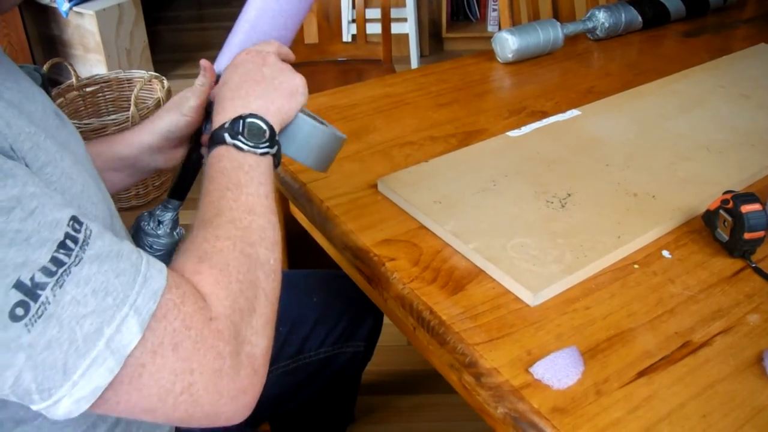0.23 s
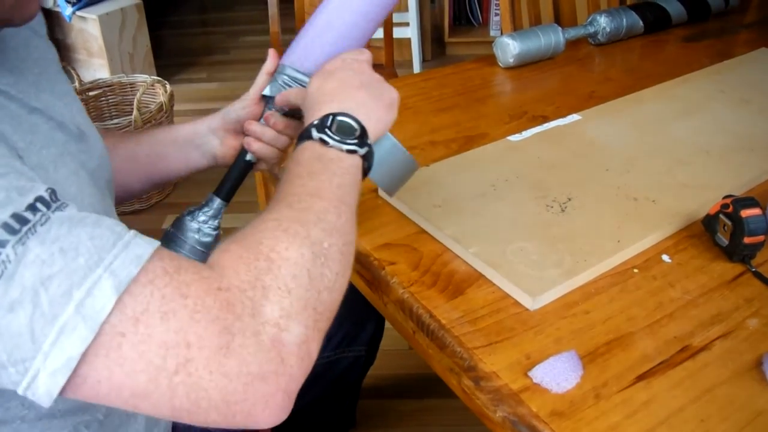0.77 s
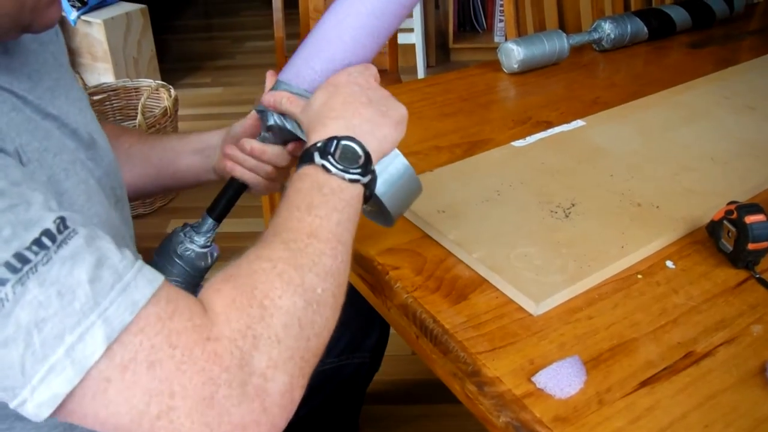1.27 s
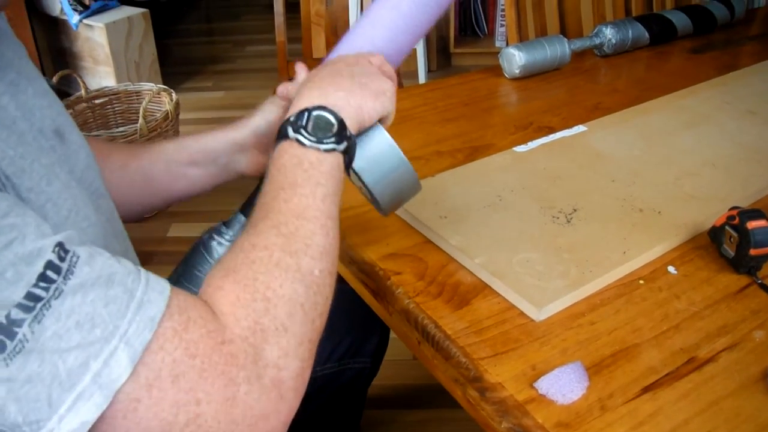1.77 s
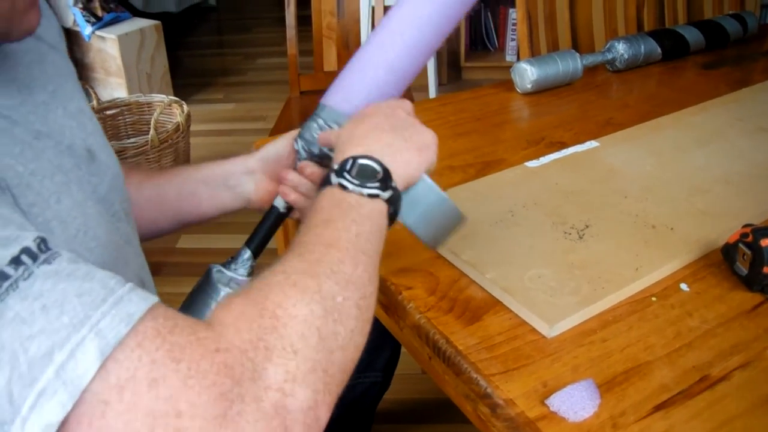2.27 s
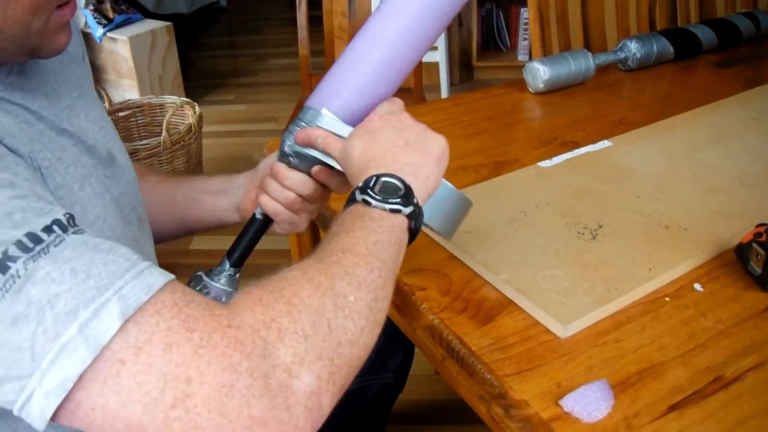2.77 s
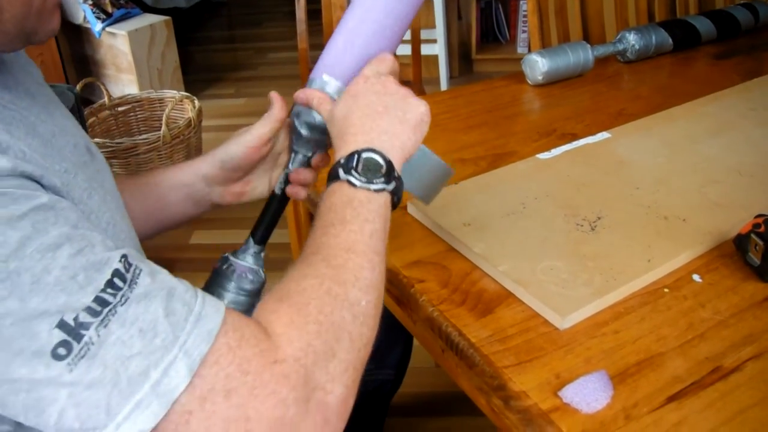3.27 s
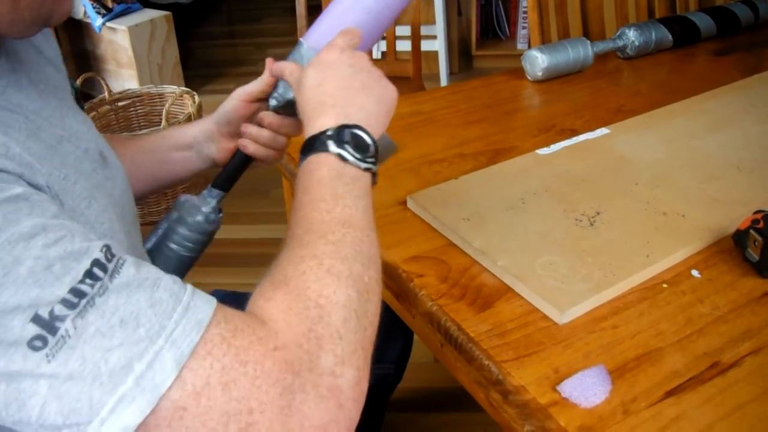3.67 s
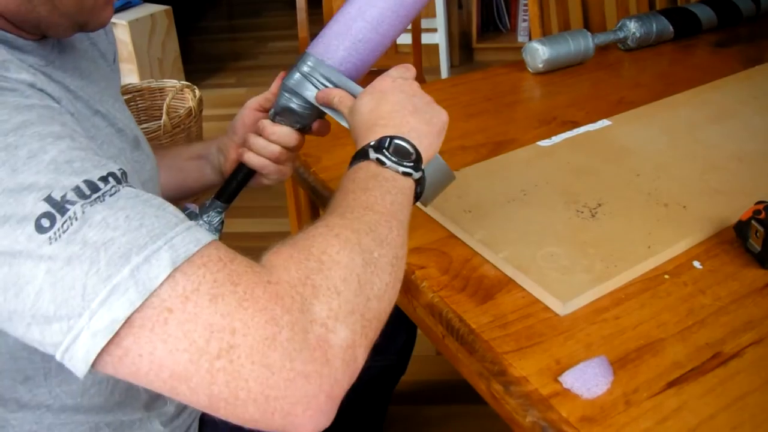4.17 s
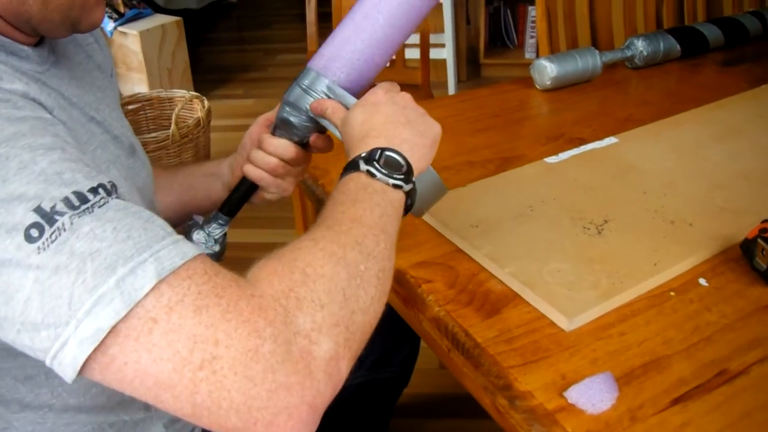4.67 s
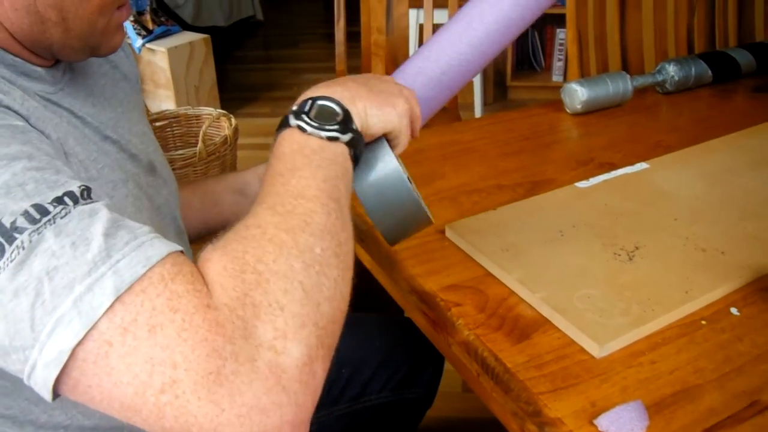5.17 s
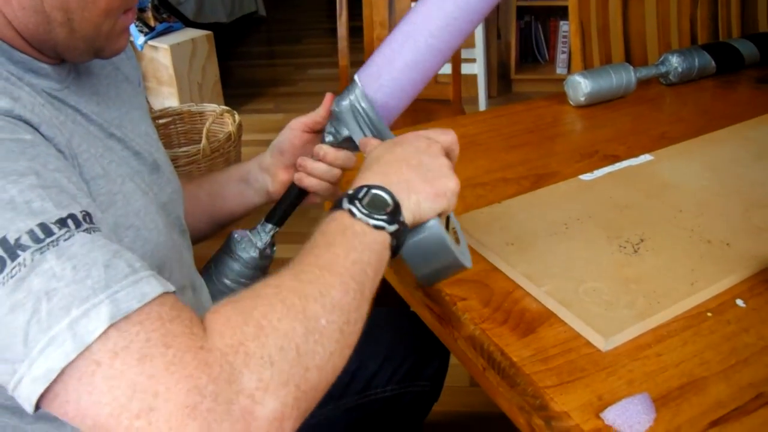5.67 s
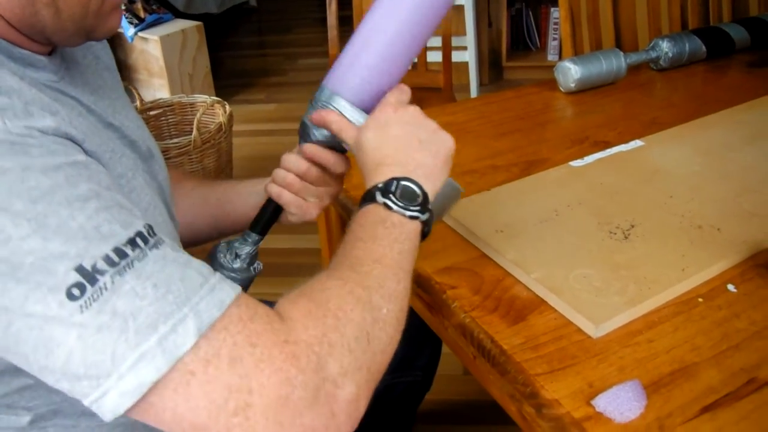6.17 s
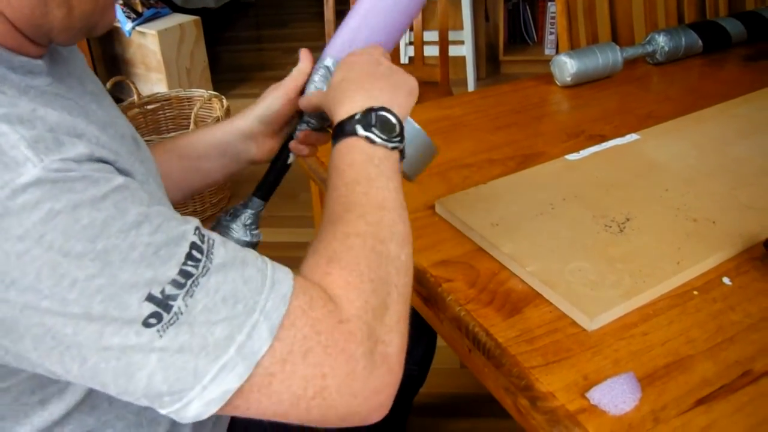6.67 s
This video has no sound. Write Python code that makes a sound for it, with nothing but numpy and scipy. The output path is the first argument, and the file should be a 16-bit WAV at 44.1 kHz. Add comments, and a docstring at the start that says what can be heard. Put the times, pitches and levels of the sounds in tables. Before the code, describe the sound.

Close in a live wooden room, duct tape is pulled from its roll in short ripping tugs. Glue snaps crowd into harsh rasps, the loudest distorting the microphone and making the hollow roll ring. Between tugs come little crease ticks, a few dull handle knocks and thin high chirps from the camera's focus motor, over faint hiss, hum and buzz.

```python
"""A faint hiss, hum and electrical buzz, then duct tape is ripped off its roll in short tugs.
It is wound round a handle at a table in a live room. The glue lets go in sharp snaps, made of short noise
bursts; they crowd into a rasp, set the hollow roll ringing and overload the microphone.
Small ticks come from creasing tape, dull knocks from the handle, and chirps from the camera's focus motor."""
import sys
import numpy as np
from scipy import signal
from scipy.fft import rfft, irfft
from scipy.io import wavfile

SR = 44100
rng = np.random.default_rng(int(sys.argv[2]) if len(sys.argv) > 2 else 0)


def materialize(psi):
    """Save the field psi as 16-bit PCM at rate SR to the path in sys.argv[1].

    A 1-D psi becomes a single channel; in a 2-D psi each row is a channel.
    """
    bounded = np.clip(np.atleast_2d(psi).T, -1, 1)
    quanta = np.round(bounded * 32767).astype(np.int16)
    wavfile.write(sys.argv[1], SR, quanta)


N = 305172
TIME = np.arange(N) / SR   # seconds
PICTURE_S = 1 / 30   # time from one camera picture to the next

# Tone colour of breaking glue. Each row: frequency in Hz, relative level in dB.
TAPE_COLOUR = [(120, -30), (250, -23.5), (450, -14.5), (750, -15), (1100, -9), (1450, 1), (2000, 1.5),
               (3000, 0.5), (4200, -4.5), (5400, -5.5), (6300, -8), (7200, -15), (10000, -28.5),
               (15000, -61)]


def from_db(db):
    """Turn decibels into a gain factor."""
    return 10 ** (np.asarray(db) / 20)


def rms_one(x):
    """Scale a sound to an average power of one."""
    return x / np.sqrt(np.mean(x ** 2) + 1e-20)


def at_hz(points, hz):
    """Read a table between its rows, on a log-frequency axis."""
    f, value = np.transpose(points)
    return np.interp(np.log(np.maximum(hz, 1)), np.log(f), value)


def butter(x, hz, kind, order=2):
    """Keep the low, high or middle frequencies with a Butterworth filter."""
    sections = signal.butter(order, np.clip(hz, 10, .45 * SR), kind, fs=SR, output="sos")
    return signal.sosfilt(sections, x + 1e-18)


def colour(x, spectrum, size=2048):
    """Give a sound the table's spectrum, with a filter that responds as early as it can (minimum phase)."""
    gain = from_db(at_hz(spectrum, np.arange(size // 2 + 1) * SR / size))
    cepstrum = irfft(np.log(gain))
    # Folding the cepstrum onto positive times makes the filter minimum-phase.
    cepstrum[1:size // 2] *= 2
    cepstrum[size // 2 + 1:] = 0
    response = irfft(np.exp(rfft(cepstrum)))
    filtered = signal.fftconvolve(np.atleast_2d(x), response[None], axes=1)
    return filtered[:, :x.shape[-1]].reshape(x.shape)


def resonance(x, hz, width_hz):
    """Pass a sound through one resonance with gain 1 at its peak."""
    r = np.exp(-np.pi * width_hz / SR)
    top = np.array([1, 0, -1]) * (1 - r * r) / 2
    return signal.lfilter(top, [1, -2 * r * np.cos(2 * np.pi * hz / SR), r * r], x + 1e-18)


def ring(clicks, hz, t60):
    """Each click starts a sine that fades by 60 dB in t60 seconds."""
    r = from_db(-60 / (t60 * SR))
    w = 2 * np.pi * hz / SR
    return signal.lfilter([0, np.sin(w)], [1, -2 * r * np.cos(w), r * r], clicks + 1e-18)


def add(track, s, sound):
    """Mix a short sound into a track at time s."""
    i = int(np.clip(s * SR, 0, N - 1))
    track[i:i + len(sound)] += sound[:N - i]


def burst_noise(fade, count=3):
    """Make fading noise, evened out in frequency like a sharp crack."""
    noise = rng.standard_normal(fade.shape) * fade
    for _ in range(count):
        flat = irfft(np.exp(1j * np.angle(rfft(noise))))   # keep the phases, make all strengths equal
        noise = flat * np.minimum(1, 10 * fade)
    return noise


def background(hiss_db=-46, buzz_db=-48, buzz_low_hz=80, buzz_high_hz=240):
    """Add noise hiss, mains-hum sines and a soft electrical pulse for each picture that the camera takes."""
    # Colour of the hiss. Each row: frequency in Hz, relative level in dB per Hz.
    hiss_colour = [(25, -15), (90, 17.5), (200, 5), (400, 8), (700, 7), (1250, 4), (1700, 9.5), (2400, 0.5),
                   (3800, 11.5), (5300, 7), (7500, -8.5), (15000, -12.5)]
    # Mains hum. Each row: frequency in Hz, level in dB rms.
    hum_tones = [(100, -52), (200, -55.5)]
    pulses = np.zeros(N)
    first_s = .024
    for s in np.arange(first_s, N / SR, PICTURE_S):
        add(pulses, s, 1 + 0.16 * rng.standard_normal(1))
    buzz = rms_one(butter(pulses, [buzz_low_hz, buzz_high_hz], "band"))
    hum = sum(from_db(db) * rms_one(np.sin(2 * np.pi * hz * TIME)) for hz, db in hum_tones)
    hiss = rms_one(colour(rng.standard_normal(N), hiss_colour))
    return from_db(hiss_db) * hiss + from_db(buzz_db) * buzz + hum


def fading_echo(level_db=-37, decay_s=0.074):
    """The room still rings from the tug before: tape-coloured noise dies away from the start."""
    echo = rms_one(colour(rng.standard_normal(N), TAPE_COLOUR))
    return from_db(level_db) * np.exp(-TIME / decay_s) * echo


def creases(per_s=9, middle_db=-28, spread_db=3, low_hz=1700, high_hz=5000):
    """List faint ticks at random moments and pitches as the fingers work the tape."""
    when, strong, high = rng.random((int(per_s * N / SR), 3)).T
    levels_db = middle_db + spread_db * (2 * strong - 1)
    pitches_hz = low_hz * (high_hz / low_hz) ** high
    return list(zip(when * N / SR, levels_db, pitches_hz))


def ticks(level_db=12, decay_s=0.00072, width_share=0.49, skirt_share=2.5, low_hz=1200, top_hz=6200, size=400):
    """A crease gives way: a very short noise burst goes through two broad filters at one centre frequency."""
    # Ticks of creasing tape and fingers.
    # Each row: start in seconds, level in dB before level_db is added, centre in Hz.
    tick_list = [(0.138, -15.5, 3220), (0.513, -8, 2960), (1.101, 14, 5760), (1.469, -20.5, 3160),
                 (1.672, -23, 1920), (2.063, -15.5, 2840), (3.074, -11, 2306), (3.116, -9, 2530),
                 (3.236, -2, 2486), (4.064, -6.5, 3400), (4.435, -7, 4640), (5.71, -17.5, 3970),
                 (6.004, -7.5, 4100), (6.116, -15.5, 4920), (6.175, -13.5, 1480), (6.298, -16, 1790),
                 (6.331, -8.5, 1660), (6.52, -13, 3800), (6.53, -15, 3200)]
    out = np.zeros(N)
    fade = np.exp(-np.arange(size) / SR / decay_s)
    events = tick_list + creases()
    noise = burst_noise(np.tile(fade, (len(events), 1)), count=1)
    bursts = butter(noise, [low_hz, top_hz], "band", order=4)
    for (s, db, hz), burst in zip(events, bursts):
        # Widths are shares of the centre frequency.
        peak = resonance(burst, hz, width_share * hz)
        tick = resonance(peak, hz, skirt_share * hz)
        add(out, s, from_db(level_db + db) * tick / np.linalg.norm(tick))
    return out


def focus_motor(hz=5275, step_s=0.011, move_s=0.035, whine_db=-29, rasp_db=-38, rasp_hz=4100, rasp_width_hz=2200):
    """The lens motor switches a sine whine and a noise rasp on in short dry bursts inside the camera."""
    # Runs with one motor step per picture. Each row: start in seconds, number of steps.
    step_runs = [(0.201, 2), (.3, 1), (1.299, 2), (1.439, 1), (2.131, 2), (2.398, 5), (3.532, 4),
                 (3.727, 1), (5.294, 2), (5.43, 7), (6.362, 4)]
    # Longer moves of the motor: start in seconds.
    move_starts = [0.408, 5.649]
    running = np.zeros(N)
    steps = [start + k * PICTURE_S for start, count in step_runs for k in range(round(count))]
    for starts, length_s in ((steps, step_s), (move_starts, move_s)):
        for s in starts:
            add(running, s, np.ones(int(length_s * SR)))
    whine = rms_one(np.sin(2 * np.pi * hz * TIME))
    narrow = resonance(rng.standard_normal(N), rasp_hz, rasp_width_hz)
    rasp = butter(rms_one(resonance(narrow, rasp_hz, 2 * rasp_width_hz)), 7000, "low", order=4)
    switch = butter(running, 530, "low")   # softens each start and stop
    return switch * (from_db(whine_db) * whine + from_db(rasp_db) * rasp)


def slips(count=40, jitter=.2, spread_db=0.5, fade_db=2, dulling=0.89):
    """The strip sticks and slips in runs of unevenly spaced snaps; the stronger ones are duller."""
    # jitter: share of the spacing. fade_db: a run weakens by this much as the pull slackens.
    # dulling: dB of relative treble lost per dB of extra strength.
    # Runs of slips. Each row: start in seconds, end in seconds, middle level in dB before the
    # snaps' level_db is added, treble in dB relative to the middle, slips per second.
    runs = [(.492, 0.541, -10, 2, 61), (.562, 0.629, 3, -0.5, 147), (2.217, 2.252, 5.5, -0.5, 186),
            (3.28, 3.289, 0, 4, 283), (3.645, 3.667, -1.5, -4, 150), (3.809, 3.909, 3, -10.5, 125),
            (4.608, 4.63, -17.5, 10.5, 220), (4.664, 4.769, 0.5, 5.5, 107.6), (4.768, 4.844, -4.5, 12, 90),
            (4.925, 5.018, -11, 9.5, 41), (6.547, 6.572, -16.5, 7, 140), (6.626, 6.649, -2, 2.5, 62)]
    rows = []
    for start, end, db, treble_db, per_s in runs:
        late, strong = rng.standard_normal((2, count))
        number = np.arange(count)
        times = start + (number + jitter * (number > 0) * late) / per_s   # the first slip is on time
        extra_db = spread_db * strong + fade_db * (.5 - (times - start) / (end - start))
        for s, extra in zip(times, extra_db):
            if s < end:
                rows.append((s, db + extra, treble_db - dulling * extra))
    return rows


def snaps(level_db=12.5, decay_s=0.00128, growth_db=0.3, bass_hz=1100, treble_hz=2900, bright_width_hz=1900, size=900):
    """Each snap is a burst of breaking glue threads; a stronger one runs further across the tape and lasts longer."""
    # Single cracks of the glue. Each row: start in seconds, middle level in dB before level_db
    # is added, treble in dB relative to the middle.
    single_snaps = [(0.255, -9, 11.5), (0.502, -1.5, 4), (0.547, 5, 2.5), (0.593, 17, -1),
                    (0.6543, -9.5, 10.5), (1.0708, 8, 8.5), (1.1787, -3.5, 5), (2.1764, 10.5, -10),
                    (2.2122, 16, -10), (2.2668, 4.5, 9.5), (2.5645, 5.5, 4.5), (2.7084, 1.5, 8.5),
                    (2.742, 2, 12), (3.2726, 2.5, -4.5), (3.679, 5, -2), (3.7536, 11, -2), (3.802, 18, -4),
                    (3.8398, 18.5, 0), (3.8734, 1.5, 11), (3.8868, -2.5, 15.5), (4.6484, 2.5, 3.5),
                    (4.7036, -1, 0), (4.8923, -6.5, 9.5), (4.9796, -5.5, 7.5), (5.0305, -4, 10.5),
                    (5.1022, -2, 8.5), (5.1372, -6, 11.5), (5.1663, -10.5, 16.5), (5.7858, 3, 9),
                    (5.8195, -3.5, 12), (6.5368, -6.5, 3.5), (6.573, -12, 4), (6.6031, -5, 13),
                    (6.6557, -2, 3.5), (6.8664, -7, -3), (6.8711, 7, 1), (6.9051, 0.5, 12),
                    (6.9101, 14.5, -10)]
    # What the snaps of one tug share; a tighter strip sounds higher.
    # Each row: start in seconds, brightest tone in Hz, bass in dB relative to the middle.
    tugs = [(.2, 4800, -16), (.45, 3840, -10.5), (1.0, 5200, -4.5), (2.1, 4220, -8.5), (2.5, 5700, -8.5),
            (2.65, 4570, -5), (3.2, 4100, -16), (3.7, 4111, -10), (4.5, 4780, -15), (4.74, 4670, -5),
            (5.7, 4700, -3), (6.45, 3735, -10.5), (6.8, 3780, -13.5)]
    t, out = np.arange(size) / SR, np.zeros(N)
    events = np.array(single_snaps + slips())
    tug_starts = np.array(tugs)[:, 0]
    fade = np.exp(-t / (decay_s * from_db(growth_db * events[:, 1:2])))
    edges = [60, bass_hz, treble_hz, 16000]
    # Bass, middle and treble each get their own noise.
    bands = [colour(butter(burst_noise(fade), edges[k:k + 2], "band", order=4), TAPE_COLOUR) for k in range(3)]
    for (s, db, treble_db), bass, middle, treble in zip(events, *bands):
        _, bright_hz, bass_db = tugs[np.searchsorted(tug_starts, s) - 1]
        treble = resonance(treble, bright_hz, bright_width_hz)
        for burst, relative_db in ((bass, bass_db), (middle, 0), (treble, treble_db)):
            add(out, s, from_db(level_db + db + relative_db) * burst / np.linalg.norm(burst))
    return out


def crackle(peel, per_s=300, level_db=-15, linger_s=0.025, spread_db=4):
    """While the tape is moving, stray threads break between the snaps: random clicks follow the snaps' strength."""
    r = np.exp(-1 / (linger_s * SR))
    activity = np.sqrt(signal.lfilter([1 - r], [1, -r], peel ** 2 + 1e-18))
    present = rng.random(N) < per_s / SR
    clicks = present * from_db(spread_db * rng.standard_normal(N)) * rng.choice([-1, 1], N)
    return from_db(level_db) * activity * rms_one(colour(clicks, TAPE_COLOUR))


def roll(peel, width_share=0.13, level_db=8, top_hz=1300):
    """The snaps set the roll and the taut strip ringing, at pitches set by grip and pull."""
    # Each row: start in seconds, end in seconds, pitch in Hz, level in dB before level_db is added.
    pitches = [(0.58, .67, 443, -5), (0.548, .67, 540, -3.5), (2.17, 2.28, 450, -5), (2.545, 2.6, 1080, 0),
               (2.722, 2.76, 370, -5), (3.751, 3.92, 439, -6), (3.75, 3.92, 308, -1),
               (4.632, 4.87, 370.9, -0.5), (4.866, 5.18, 291.2, 2), (5.77, 5.84, 1060, -6.5),
               (6.584, 6.926, 382, 8)]
    rings = np.zeros(N)
    for start, end, hz, db in pitches:
        struck = peel * ((TIME > start) & (TIME < end))
        rings += from_db(db) * resonance(struck, hz, width_share * hz)
    return from_db(level_db) * butter(rings, top_hz, "low")


def room(x, wet_db=-6.0, early_db=-8, early_s=0.0048, gap_s=0.0011, size=44100):
    """Close reflections come from table and body, then a diffuse noise tail dies band by band."""
    # Fading of the tail. Each row: frequency in Hz, time to fade by 60 dB in seconds.
    fade_times = [(150, 0.49), (500, 0.63), (1400, 0.67), (3700, 0.64), (6000, 0.62), (10000, 0.43)]
    # Colour of all reflections. Each row: frequency in Hz, gain in dB.
    echo_colour = [(150, 4), (500, 4), (1400, 0.5), (3000, -4), (5500, -0.5), (9000, -5.5)]
    t, tail = np.arange(size) / SR, 0
    edges = np.geomspace(70, 18000, 13)
    for low, high in zip(edges, edges[1:]):
        t60 = at_hz(fade_times, np.sqrt(low * high))
        band = butter(rng.standard_normal(size), [low, high], "band")
        tail = tail + band * np.exp(-np.log(1000) * t / t60)
    early = rng.standard_normal(size) * np.exp(-t / early_s)
    arrival = 1 - np.exp(-(t / gap_s) ** 2)   # reflections build up just after the direct sound
    reflections = from_db(wet_db) * rms_one(tail * arrival) + from_db(early_db) * rms_one(early * arrival)
    response = reflections / np.sqrt(size)
    return colour(signal.fftconvolve(x, response)[:N], echo_colour)


def knocks():
    """The hands knock dully against the handle: each click starts several quickly fading sines."""
    # Each row: start in seconds, strength in dB.
    blows = [(4.016, 1), (4.598, -11), (5.419, -17), (5.455, -18.5), (5.503, -22), (5.583, -18.5)]
    # What the handle rings with. Each row: pitch in Hz, level in dB for a blow of 0 dB,
    # time to fade by 60 dB in seconds.
    handle_tones = [(120, -27, 0.049), (189, -20.5, 0.044), (350, -26, 0.074), (743, -17.5, 0.023),
                    (1100, -15, 0.011), (2060, -10, 0.0076), (4030, -7, 0.013)]
    clicks = np.zeros(N)
    for s, db in blows:
        add(clicks, s, from_db([db]))
    return sum(from_db(db) * ring(clicks, hz, t60) for hz, db, t60 in handle_tones)


def scene():
    """Tape, roll, ticks and knocks are heard directly and through the room; the camera adds its own noises."""
    peel = snaps()
    tape = peel + crackle(peel) + roll(peel)
    handling = knocks() + ticks()
    sound = tape + handling + room(tape + from_db(-1.5) * handling)
    return (sound + fading_echo() + focus_motor() + background())[None]


def record(dry, ceiling=0.94, low_cut_hz=95, notch_hz=7800, notch_width_hz=350, cutoff_hz=15900):
    """The input clips hard; the camera then cuts the rumble, a narrow notch and the top."""
    clipped = butter(np.clip(dry, -ceiling, ceiling), low_cut_hz, "high")
    notched = clipped - resonance(clipped, notch_hz, notch_width_hz)
    top_cut = signal.ellip(8, .3, 60, cutoff_hz, fs=SR, output="sos")
    return signal.sosfilt(top_cut, notched)


dry = scene()
out = record(dry)
materialize(out)
```